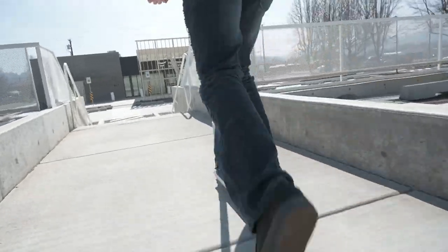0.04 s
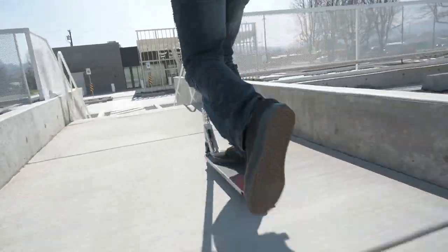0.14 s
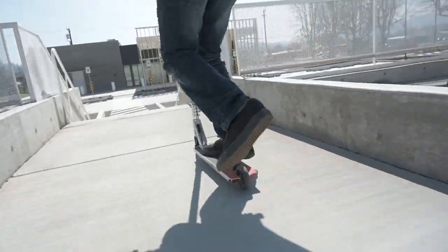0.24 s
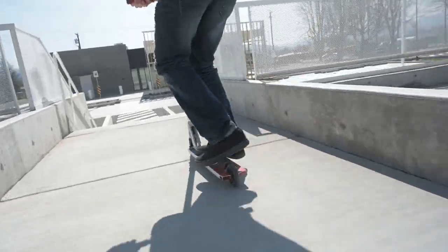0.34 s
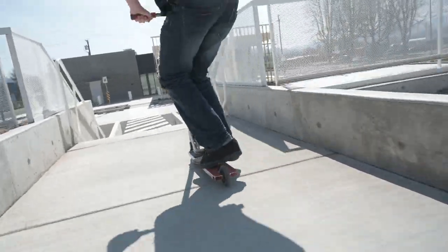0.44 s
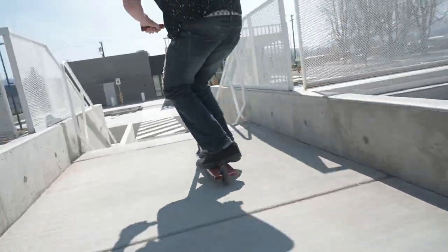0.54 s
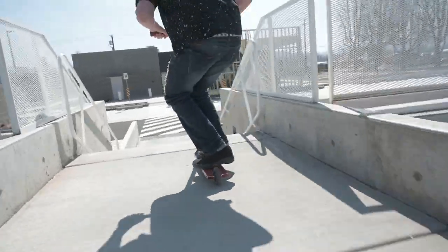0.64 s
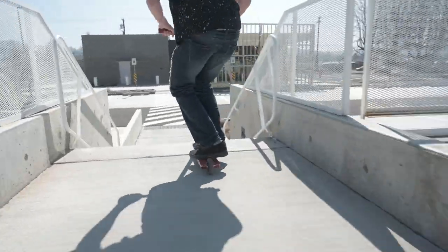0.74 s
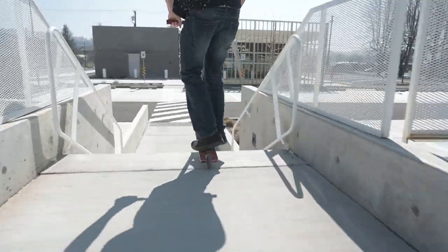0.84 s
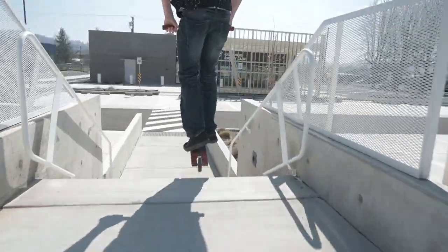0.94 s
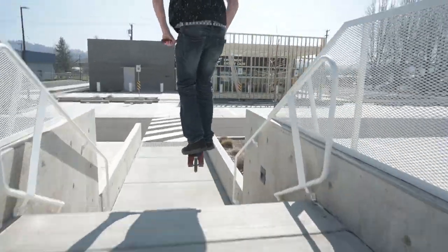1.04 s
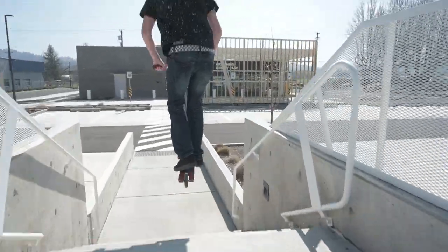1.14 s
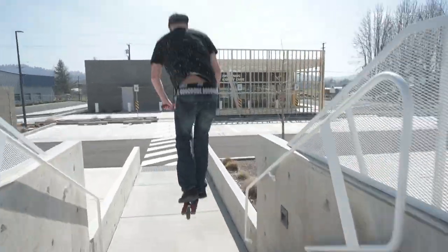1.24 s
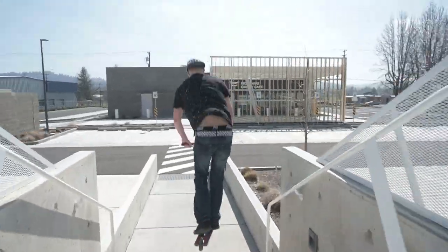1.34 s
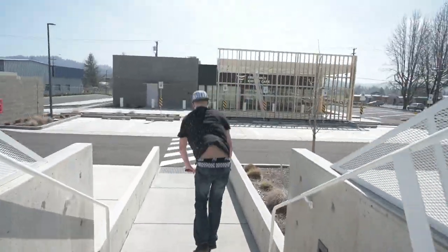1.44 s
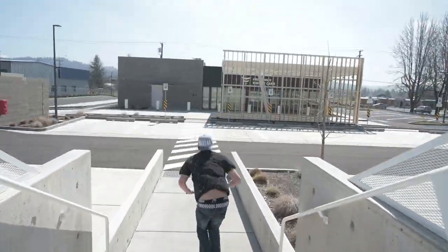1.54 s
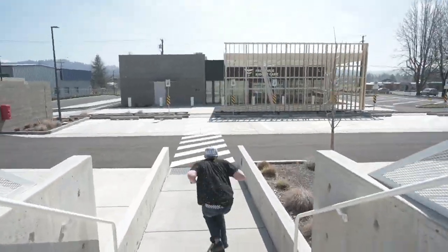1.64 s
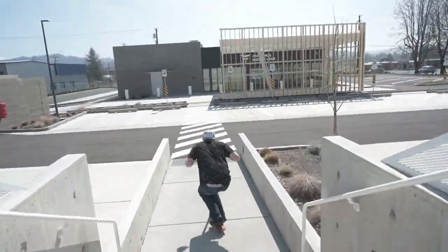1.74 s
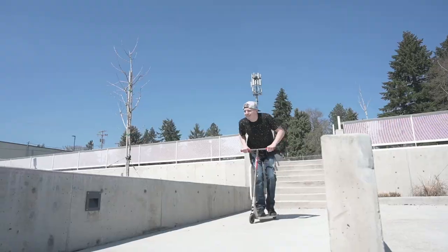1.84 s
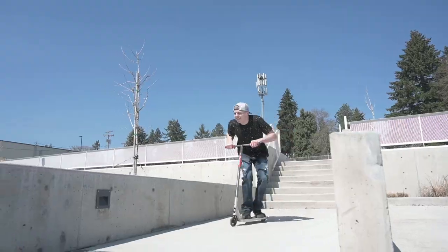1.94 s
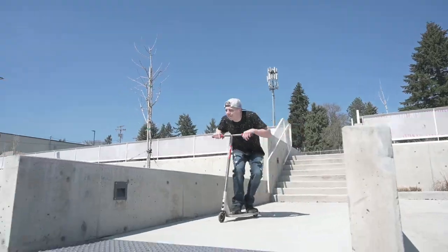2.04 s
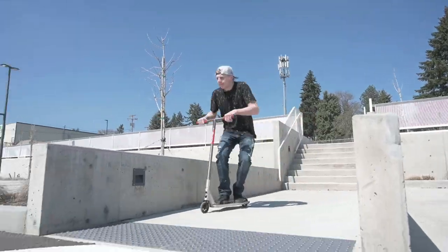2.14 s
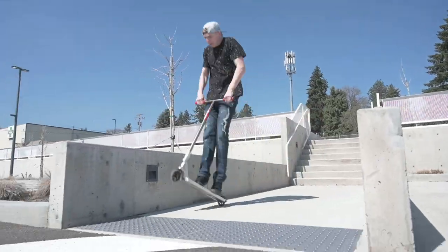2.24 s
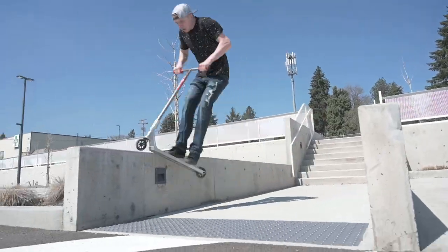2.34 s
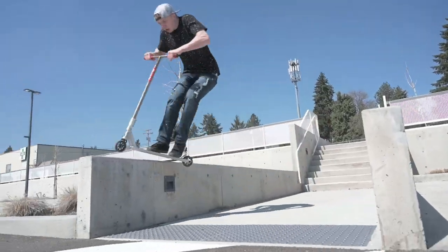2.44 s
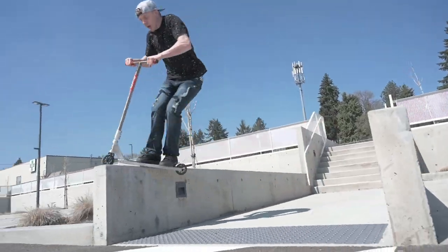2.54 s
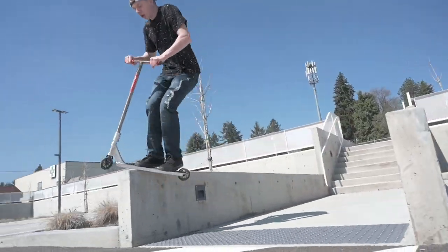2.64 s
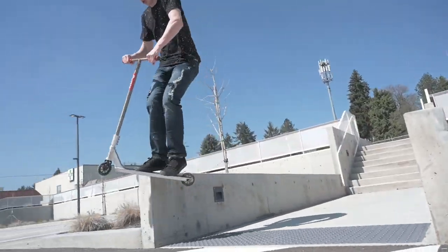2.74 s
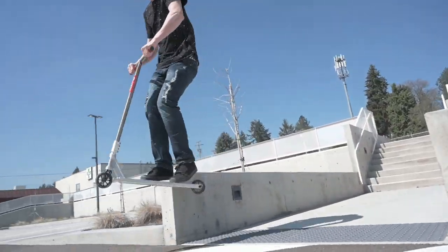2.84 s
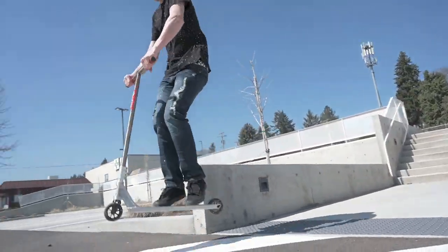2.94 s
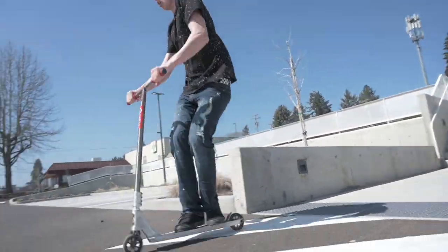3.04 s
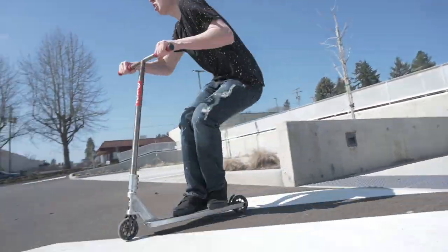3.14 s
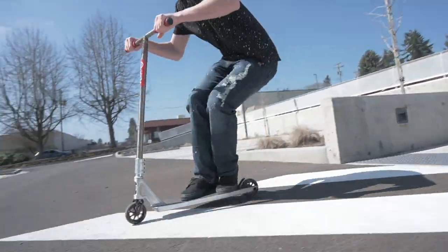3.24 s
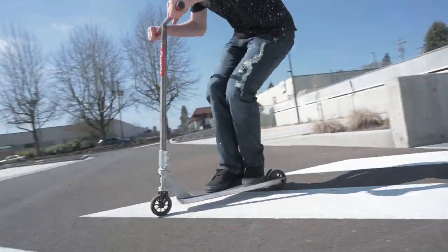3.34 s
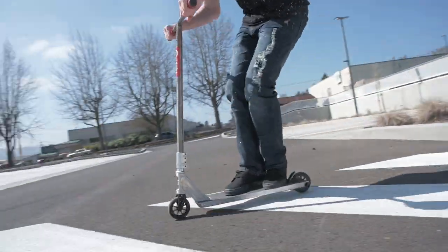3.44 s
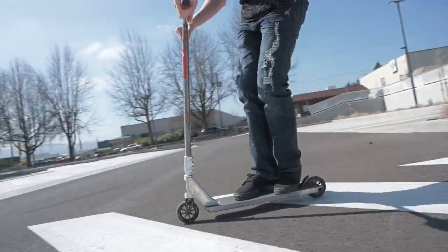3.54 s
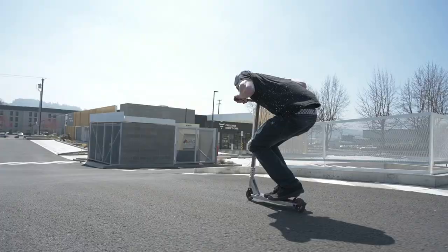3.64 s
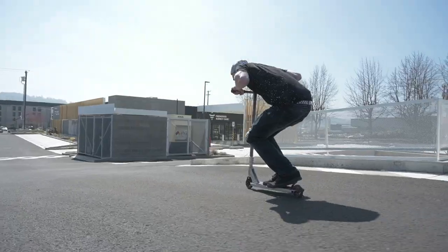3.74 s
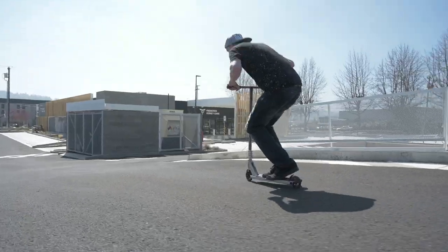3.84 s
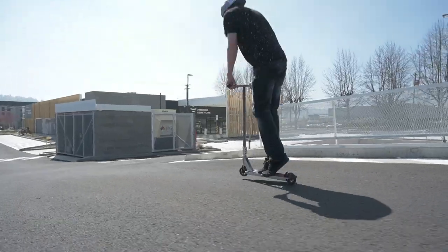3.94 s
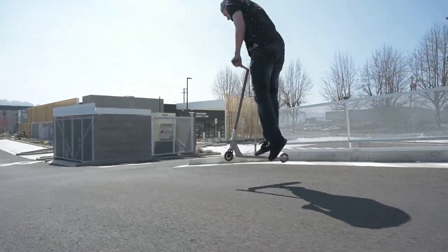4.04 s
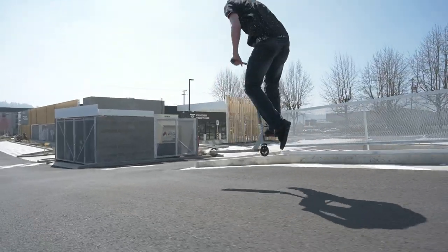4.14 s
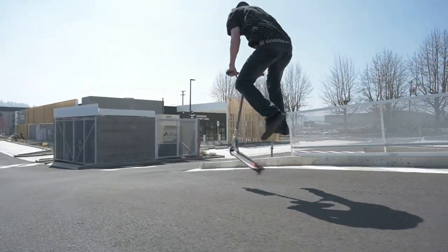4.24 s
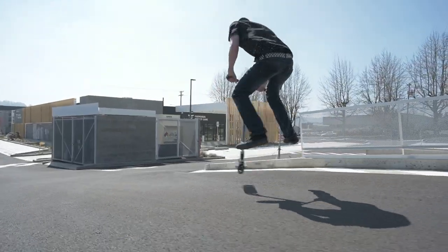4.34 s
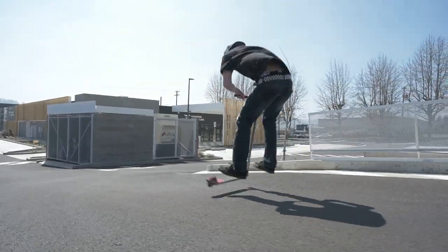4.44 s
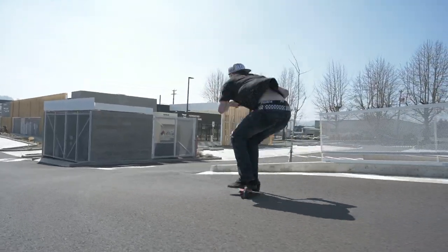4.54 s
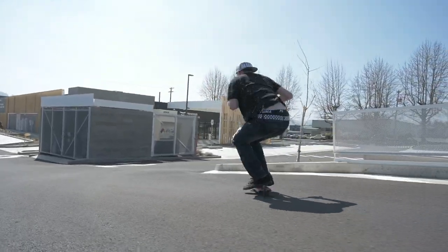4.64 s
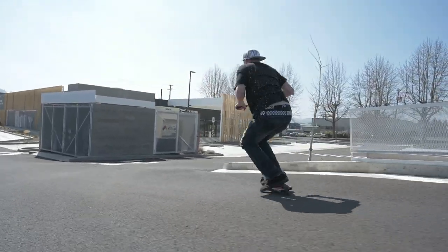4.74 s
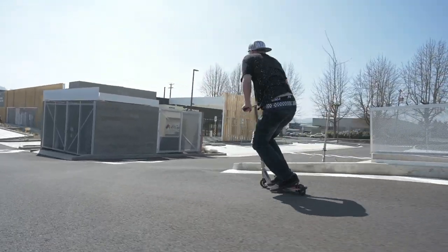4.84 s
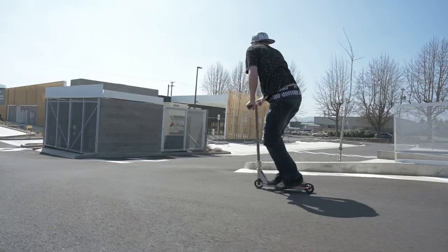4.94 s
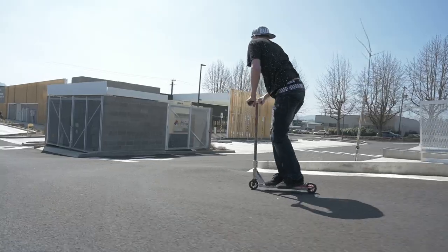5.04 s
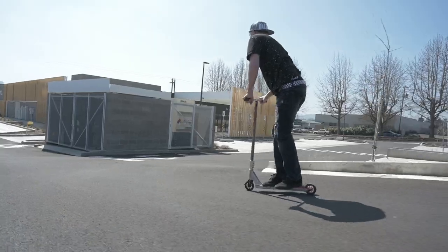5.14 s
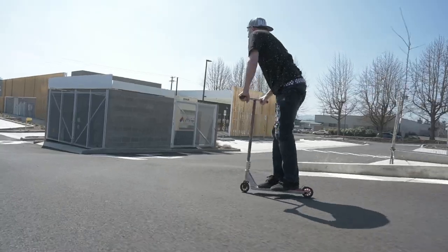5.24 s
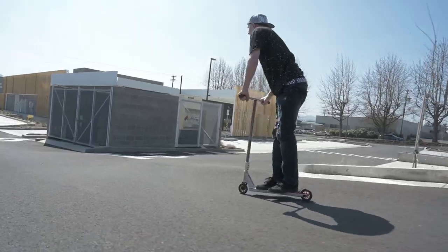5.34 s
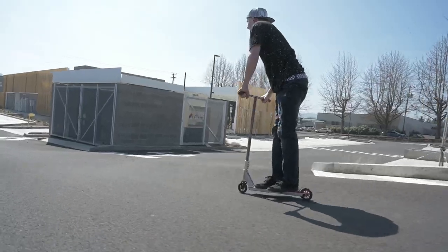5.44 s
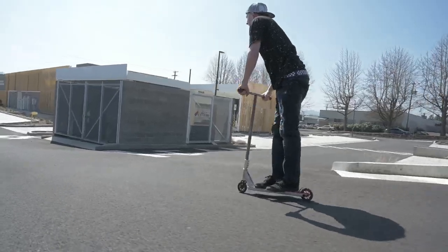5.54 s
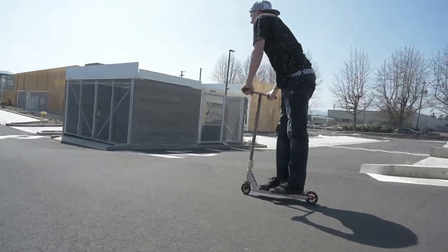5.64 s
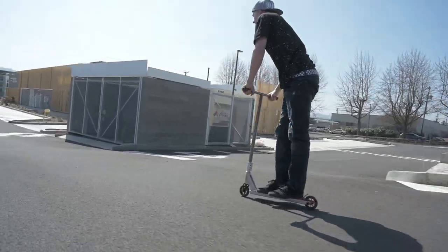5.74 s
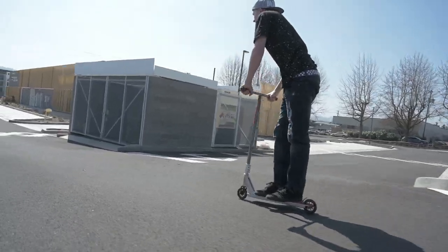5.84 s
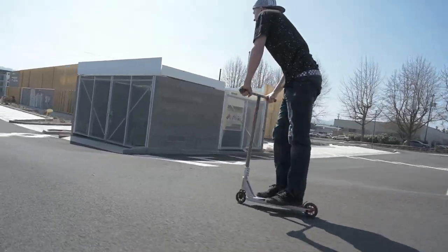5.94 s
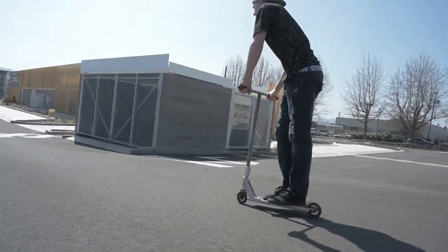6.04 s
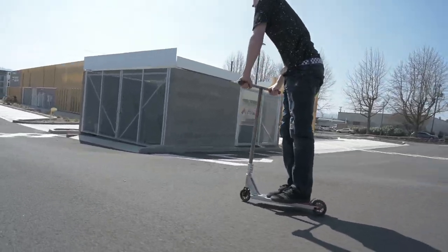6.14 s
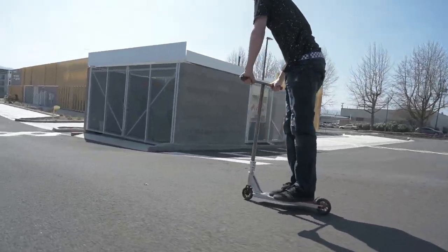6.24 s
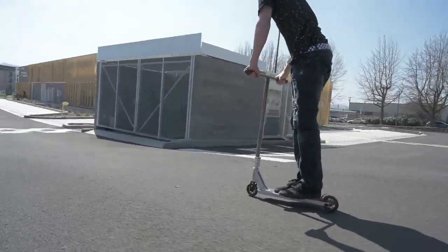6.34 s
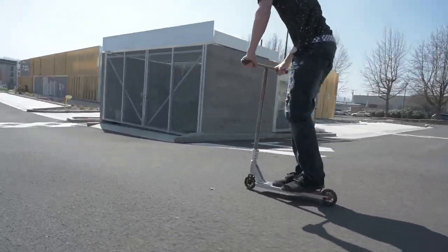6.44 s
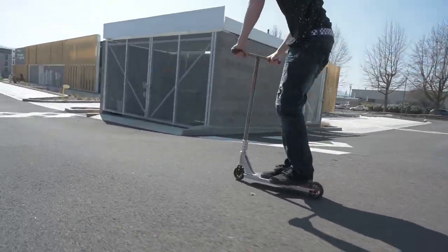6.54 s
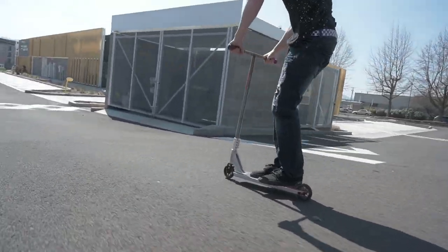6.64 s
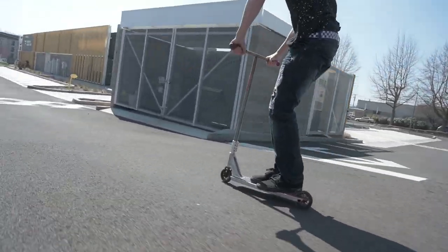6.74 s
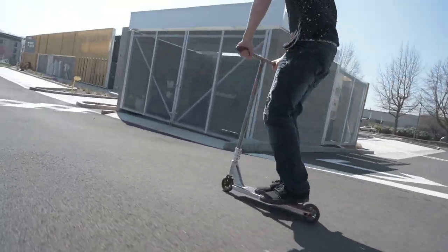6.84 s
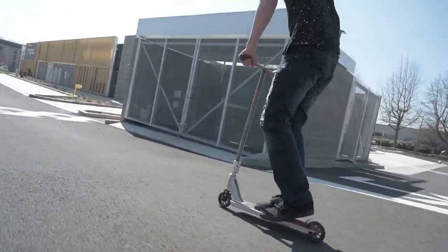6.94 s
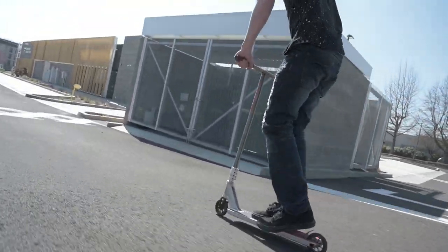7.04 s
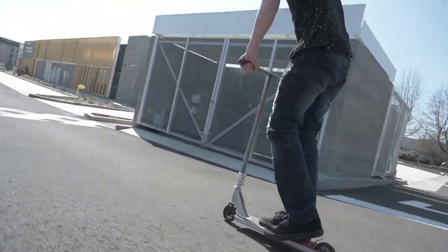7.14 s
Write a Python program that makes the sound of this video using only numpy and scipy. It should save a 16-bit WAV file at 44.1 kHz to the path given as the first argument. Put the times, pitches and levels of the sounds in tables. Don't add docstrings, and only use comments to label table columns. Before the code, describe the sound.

Outdoors, hard scooter wheels roll and knock, a metal deck slams and scrapes a ledge, then grainy asphalt rolling grows with small bright ticks.

```python
import sys
import numpy as np
from scipy import signal
from scipy.fft import rfft, irfft, next_fast_len
from scipy.io import wavfile
from scipy.ndimage import uniform_filter1d, map_coordinates

SR = 44100
rng = np.random.default_rng(int(sys.argv[2]) if len(sys.argv) > 2 else 0)


def file_out(sig):
    cols = np.atleast_2d(sig).T
    lim = np.clip(cols, -1, 1)
    pcm = np.round(lim * 32767).astype(np.int16)
    wavfile.write(sys.argv[1], SR, pcm)


def invert_db(level):
    return 10 ** (np.asarray(level, dtype=float) / 20)


N = 317079
ASPHALT_S = 3.7
MIDDLING_DB = -55
ON_ASPHALT = np.arange(N) > ASPHALT_S * SR


def unit(x):
    return x / np.sqrt(np.mean(x ** 2) + 1e-20)


def along(points, hz):
    f, value = np.transpose(points)
    return np.interp(np.log(hz + 1), np.log(f + 1), value)


def curves(rows):
    s, *columns = np.transpose(rows)
    return [np.interp(np.arange(N) / SR, s, column, -120, -120) for column in columns]


def wobble(rate):
    knots = rng.standard_normal(int(N * rate / SR) + 4)
    return map_coordinates(knots, [np.arange(N) * rate / SR])


def filtered(x, response):
    m = next_fast_len(N + SR // 4)
    return irfft(rfft(x, m) * response(np.fft.rfftfreq(m, 1 / SR)), m)[..., :N]


def rings(x, modes):
    def response(f):
        total = 0
        for k, (center, width, db) in enumerate(modes):
            resonance = 1j * f * width / (center ** 2 - f ** 2 + 1j * f * width)
            total = total + (-1) ** k * invert_db(db) * resonance
        return total
    return filtered(x, response)


def rush(spectrum, patchy_db, grain_db=0):
    raw = rng.standard_normal(N) * invert_db(grain_db * rng.standard_normal(N))
    z = signal.stft(raw, nperseg=512)[2]
    across_pitch = uniform_filter1d(rng.standard_normal(z.shape), 5, 0)
    patches = unit(uniform_filter1d(across_pitch, 10, 1))
    patchy = signal.istft(z * invert_db(patchy_db * patches), nperseg=512)[1][:N]
    return unit(filtered(patchy, lambda hz: invert_db(along(spectrum, hz))))


def bursts(times, db, t60, edge=0):
    t = np.arange(SR // 10) / SR
    force = np.zeros(N + SR)
    for s, level, life in np.broadcast(times, db, t60):
        shape = invert_db(-60 * t / max(life, .001))
        size = np.linalg.norm(shape)
        puff = rng.standard_normal(len(t)) * shape
        puff[0] = edge * size
        force[round(s * SR):][:len(t)] += invert_db(level) * puff * size / np.linalg.norm(puff)
    return force[:N]


def pushes(rows, decay_db, rise):
    out = np.zeros(N + SR)
    t = np.arange(SR // 8) / SR
    for s, db, hz in rows:
        swell = 1 - np.exp(-t * hz / rise)
        push = invert_db(db - decay_db * hz * t) * swell * np.sin(2 * np.pi * hz * t)
        out[round(s * SR):][:len(t)] -= push
    return out[:N]


# pitch in Hz, level in dB.
TRAFFIC = [(35, -39), (60, -19), (136, -1), (167, -2.5), (446, -8.5), (604, -6), (818, -23), (1190, -9),
           (1650, -14.5), (2390, -20.5), (8240, -40), (10400, -38), (15800, -40.5)]


def traffic():
    return invert_db(-60) * rush(TRAFFIC, patchy_db=1.3)


def whine():
    note = rings(rng.standard_normal(N), [(1870, 20, 0)])
    return invert_db(-79) * unit(note) * ~ON_ASPHALT


# pitch in Hz, level in dB.
WIND = [(12, -40), (20, 5.5), (86, 10.5), (200, -4), (260, -48.5), (440, -120)]
# time in seconds, level in dB.
GUSTS = [(0.0, -43), (0.25, -50), (0.8, -61.5), (1.16, -51), (1.34, -56), (1.48, -54), (1.84, -68),
         (2.4, -77.5), (3.16, -67.5), (3.94, -66), (4.6, -72.5), (5.1, -64), (5.85, -57), (6.15, -59),
         (6.5, -53), (7.19, -54.5)]


def wind():
    gust_db, = curves(GUSTS)
    return invert_db(gust_db - 3 + wobble(11)) * rush(WIND, patchy_db=4)


# time in seconds, level in dB.
ROLL = [(0.0, -46), (0.22, -53.5), (0.85, -51.5), (1.45, -60.5), (1.68, -51.5), (1.84, -60), (2.54, -58.5),
        (2.7, -50), (2.84, -61), (3.16, -56.5), (3.56, -57.5), (4.4, -61), (4.75, -55.5), (5.04, -52.5),
        (5.85, -51), (6.45, -47.5), (6.66, -44.5), (7.19, -44)]
# pitch in Hz, level in dB per Hz.
RUMBLE = [(53, -16.5), (90, -11.5), (216, -3), (340, -0.5), (409, -3), (467, 1), (562, -6.5), (622, -1),
          (900, -2.5), (1280, -12.5), (2510, -17.5), (5000, -39.5), (6500, -63), (11000, -120)]
# pitch in Hz, level in dB.
GRIT = [(1470, -27.5), (2500, -6), (4190, -11), (5210, -13.5), (6030, -17.5), (8540, -16), (10600, -28),
        (13200, -22), (15800, -43)]
# pitch in Hz, level in dB.
GRIT_ASPHALT = [(1470, -26), (2500, -8.5), (4670, -9), (6770, 0), (8340, -8.5), (9370, -8.5), (13900, -15),
                (15800, -28)]


def wheels():
    roll_db, = curves(ROLL)
    jolt_db = 0.5 * wobble(7) + 0.7 * wobble(45)
    rumble = invert_db(roll_db + 1.5 + jolt_db) * rush(RUMBLE, patchy_db=1.8, grain_db=2)
    middling_hiss_db = np.where(ON_ASPHALT, -70, -63)
    growth = np.where(ON_ASPHALT, 0.84, 0.85)
    hiss_db = middling_hiss_db + growth * (roll_db - MIDDLING_DB)
    concrete = rush(GRIT, patchy_db=1.3, grain_db=3)
    asphalt = rush(GRIT_ASPHALT, patchy_db=1.3, grain_db=3)
    hiss = np.where(ON_ASPHALT, asphalt, concrete)
    return rumble + invert_db(hiss_db - 5.5 + 0.66 * jolt_db) * hiss


# time in seconds, pitch in Hz, level in dB.
SQUEAK = [
    (5.1, 4350, -97),
    (5.15, 4400, -83.5),
    (5.24, 4340, -78.5),
    (5.32, 4370, -94.5),
]


def squeak():
    hz, db = curves(SQUEAK)
    phase = 2 * np.pi * np.cumsum(hz + 15 * wobble(90)) / SR
    return invert_db(db + 4 + 1.9 * wobble(60)) * np.sin(phase)


# time in seconds, peak level in dB.
SNAPS = [
    (3.1974, -38.5),
    (3.2186, -26.5),
    (3.2224, -40.5),
    (3.2454, -56),
    (3.2684, -36.5),
    (4.0153, -32.5),
    (6.2801, -49),
]


def snaps():
    s, db = np.transpose(SNAPS)
    return rings(bursts(s, db, t60=0.00297), [(10000, 12000, -3)])


# time in seconds, peak level in dB, pitch in Hz.
BUMPS = [(0.148, -39.5, 86), (0.392, -35, 153), (0.774, -35.5, 150), (1.055, -40, 149), (1.166, -20.5, 90),
         (1.197, -20.5, 87), (1.249, -36, 90), (1.37, -36.5, 94), (1.417, -40, 108), (1.773, -29.5, 119),
         (1.934, -35, 139.4), (2.533, -31, 248), (3.149, -35, 154.4)]


def bumps():
    return invert_db(9) * pushes(BUMPS, decay_db=10, rise=0.55)


# start in seconds, length in seconds, level in dB.
CHATTERS = [(3.855, .07, -48.5), (4.775, .06, -47.5), (4.888, .18, -47), (5.235, .04, -50),
            (5.356, .06, -50), (5.84, .02, -51.5), (5.909, .11, -49), (6.12, .09, -52), (6.351, .02, -40.5),
            (6.525, .03, -46), (6.646, .09, -51), (6.761, .08, -49.5), (6.875, .12, -47.5),
            (7.061, 0.055, -41)]


def chatters():
    beat_s = 0.015
    rows = []
    for start, length, db in CHATTERS:
        for k in range(int(length / beat_s) + 1):
            late_s, louder_db = rng.standard_normal(2) * (0.0015, 3)
            rows.append((start + k * beat_s + late_s, db + louder_db))
    return rows


# time in seconds, peak level in dB.
EARLY_TICKS = [(0.0114, -41), (0.0257, -43.5), (0.0397, -39.5), (0.059, -52), (0.0973, -49), (0.4654, -39),
               (0.4838, -43.5), (0.658, -43.5), (0.6706, -51), (0.884, -55.5), (1.075, -41), (1.0959, -53),
               (1.2047, -60.5), (1.2486, -53.5)]
# time in seconds, peak level in dB.
TICKS = [(3.8724, -38), (4.0162, -41), (4.2521, -35), (4.3332, -48.5), (4.4891, -45.5), (4.5256, -51),
         (4.542, -32), (4.5834, -49), (4.8714, -38), (5.2476, -39.5), (5.3061, -45.5), (5.4649, -42.5),
         (5.5937, -50), (5.6519, -45.5), (5.7092, -44), (5.7377, -36.5), (5.8238, -46.5), (6.0204, -42.5),
         (6.3077, -34), (6.3625, -38.5), (6.4718, -39.5), (6.4852, -31), (6.5594, -38.5), (6.6047, -35),
         (6.6931, -47), (6.8457, -35), (6.8625, -34), (6.956, -40), (7.0845, -32.5), (7.167, -37.5)]
# pitch in Hz, width in Hz, level in dB.
TICK = [(9410, 346, 1), (11300, 2100, -15.5), (14350, 3800, -19)]
# pitch in Hz, width in Hz, level in dB.
TICK_BODY = [(6550, 1400, -2.5), (5230, 3700, -20)]


def ticks():
    groups = [list(EARLY_TICKS), list(TICKS), chatters()]
    s, db = np.transpose(sum(groups, []))
    kind = np.repeat([0, 1, 2], [len(group) for group in groups])
    t60 = np.take([0.015, 0.0073, 0.0073], kind)
    db = db + np.take([13, 12.5, 12.5], kind)
    body_db = np.take([-2.5, -10.5, -10], kind)
    faint_db = -29 + 0.6 * (curves(ROLL)[0] - MIDDLING_DB)
    strikes = rng.random(N) < 50 / SR
    faint = strikes * rng.standard_normal(N) * invert_db(faint_db) * ON_ASPHALT
    rebound = bursts(s + 0.01, db - 17, t60)
    softer = rings(rings(faint + rebound, TICK[:1]), [(10100, 2900, 0)])
    sharp = rings(bursts(s, db, t60), TICK) + softer
    body = bursts(s, db + body_db - 0.5, 1.54 * t60) + 0.12 * faint
    return sharp + rings(body, TICK_BODY)


# time in seconds, peak in dB, thud in dB, thud pitch in Hz.
JOINTS = [(0.096, -49, -18, 142), (0.445, -41, -1, 373), (0.467, -49, 7, 142), (0.534, -29, 5.5, 187),
          (0.651, -36, -0.5, 146), (0.785, -38.5, 3.5, 147), (0.915, -33.5, -6, 230), (1.073, -46, 2, 186),
          (1.196, -43.5, 15.5, 136), (1.249, -43.5, -14, 153), (1.277, -50.5, -3, 196),
          (1.36, -44.5, 2, 286), (1.42, -41.5, -20, 143), (1.512, -40, -33, 266), (1.543, -33, -22, 375),
          (1.75, -32.5, -3, 180)]
# time in seconds, peak in dB, thud in dB, clack in dB, thud pitch in Hz.
SLAMS = [(0.114, -14.5, -11, -17, 214), (1.574, -19, -4, -16, 140), (1.577, -4, -6, 0, 243),
         (1.587, -11, -13, 0.5, 207), (2.155, -32.5, -1, -12.5, 284), (2.181, -38, -8.5, -7.5, 242),
         (2.258, -37, -5, -10.5, 517), (2.262, -23, -19, -14.5, 370), (2.5339, -7.5, -19.5, 8, 320),
         (2.561, -26, -7.5, 3, 320), (2.635, -31, -16, 5.5, 326), (2.732, -19.5, -12.5, -20, 443),
         (2.764, -15, -44, -25.5, 516), (2.773, -19.5, -2.5, -40, 520), (3.11, -12, -6.5, 5, 235),
         (3.147, -29, -8, 0, 143), (4.009, -38.5, -9, 0, 347), (4.099, -47, -7.5, 9, 231),
         (4.544, -23.5, -12, -6, 450), (4.554, -13, -9, -6.5, 510), (4.558, -14.5, -8, -11.5, 440),
         (4.584, -15.5, -2.5, -12, 574), (4.594, -26, -2, -21, 310), (6.0665, -34.5, -7, -5.5, 390)]


def blows():
    light = [(s, db, thud_db, -11.5, hz, 0.037) for s, db, thud_db, hz in JOINTS]
    heavy = [(*row, 0.026) for row in SLAMS]
    return np.transpose(sorted(light + heavy))


# time in seconds, pressure in dB, brightness in dB.
LEDGE = [
    (2.545, -28.5, -10),
    (2.56, -30.5, -5),
    (2.62, -46.5, 3),
    (2.632, -45, 3.5),
    (2.7, -36, -0.5),
    (2.762, -37.5, -0.5),
    (2.77, -27, -1.5),
    (2.8, -38.5, -7.5),
    (2.85, -61, -1),
]
# start in seconds, length in seconds, level in dB, brightness in dB, fall in dB.
SCRAPES = [(0.0, 0.026, -43, -13.5, 4), (0.057, 0.037, -60, -7, -14), (1.591, 0.063, -20, -8.5, 29),
           (1.629, .2, -45, -7, 6), (2.131, .15, -52.5, -4.5, -5.5), (2.27, 0.082, -42.5, -8.5, 21),
           (3.143, 0.09, -35.5, -10, 21), (3.259, 0.061, -44, -8.5, 17.5), (3.94, .08, -49, -15, -1.5),
           (4.013, 0.16, -55, 0, 13.5), (4.5415, 0.031, -28.5, 1, 16), (4.594, 0.048, -37, -7, 11),
           (4.628, 0.088, -46, -7, 8.5)]


def scrapes():
    fade_in_s, fade_out_s, edge_db = 0.0021, 0.018, 15
    low_db, tilt_db = curves(LEDGE)
    low, bright = [low_db], [low_db + tilt_db]
    for s, length, db, tilt_db, fall_db in SCRAPES:
        end, end_db = s + length, db - fall_db
        level, = curves([(s - fade_in_s, db - edge_db), (s, db),
                         (end, end_db), (end + fade_out_s, end_db - edge_db)])
        low.append(level)
        bright.append(level + tilt_db)
    return np.max(low, axis=0), np.max(bright, axis=0)


# pitch in Hz, width in Hz, level in dB.
PLATE = [(494, 110, -7.5), (640, 120, -6), (809, 45, 0), (920, 120, -3), (1123, 220, -4.5),
         (1270, 150, -3.5), (1420, 110, -2), (1470, 230, -7)]
# pitch in Hz, width in Hz, level in dB.
TUBES = [(1520, 140, -4), (1940, 990, 0.5), (2355, 200, 9), (2910, 410, 5), (3660, 760, 2.5),
         (4497, 480, -1), (5900, 800, -1), (7360, 1300, -4.5), (8600, 640, -2.5), (9880, 1300, -16),
         (13300, 1500, -16)]
# pitch in Hz, width in Hz, level in dB.
BELL = [(5000, 8, 5)]
# pitch in Hz, level in dB per Hz.
GRIND = [(1180, -33), (1600, -5), (2000, -3.5), (2360, -6), (3060, -11), (3860, -12), (4590, -14.5),
         (5750, -13), (6720, -20), (8640, -19), (10600, -32), (13100, -27.5), (15800, -37)]


def deck():
    s, db, thud_db, clack_db, thud_hz, t60 = blows()
    low_db, bright_db = scrapes()
    stick_slip = unit(invert_db(1.3 * wobble(110) + 2.5 * wobble(700)))

    thud = pushes(zip(s, db + thud_db + 8.5, thud_hz), decay_db=7, rise=0.11)
    thud = filtered(thud, lambda hz: (1j * hz / (110 + 1j * hz)) ** 2)

    rub = invert_db(low_db + 14.5) * stick_slip * rng.standard_normal(N)
    force = bursts(s, db + 15, 1.48 * t60, edge=1) + rub
    plate = signal.lfilter(*signal.butter(2, 2400, fs=SR), rings(force, PLATE))

    clack = bursts(s, db + clack_db - 0.5, 0.95 * t60, edge=0.46)
    grind = invert_db(bright_db - 1) * stick_slip * rush(GRIND, patchy_db=1.24)
    near = (np.arange(N) > 2.74 * SR) & (np.arange(N) < ASPHALT_S * SR)
    bell = rings(near * (0.28 * clack + 1.4 * grind), BELL)
    return thud + plate + rings(clack, TUBES) + grind + bell


# pitch in Hz, time to fall by 60 dB in seconds.
WALLS = [(150, 0.29), (1000, 0.037), (4000, 0.023), (12000, 0.091)]


def walls(x):
    out, hop = np.zeros(N + 2 * SR), SR // 2
    for start in range(0, N, hop):
        hz, t, z = signal.stft(rng.standard_normal(hop), SR, nperseg=256)
        decay = invert_db(-60 * t / along(WALLS, hz)[:, None])
        tail = signal.istft(z * decay, SR, nperseg=256)[1]
        wet = signal.fftconvolve(x[start:start + hop], tail / np.linalg.norm(tail))
        out[start + 350:][:len(wet)] += wet
    return out[:N]


def scene():
    background = traffic() + whine() + wind()
    rolling = wheels() + squeak()
    follower = bumps() + ticks()
    metal = deck() + snaps()
    return (background + rolling + follower + metal + invert_db(-16) * walls(metal))[None]


def top_cut(x):
    return signal.sosfilt(signal.butter(12, 15990, fs=SR, output="sos"), x)


def record(dry):
    mix = dry / (1 + np.abs(dry) ** 8) ** (1 / 8)
    return top_cut(mix)


dry = scene()
out = record(dry)
file_out(out)
```